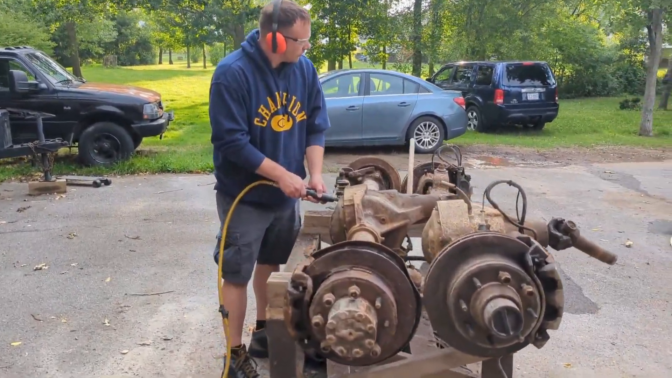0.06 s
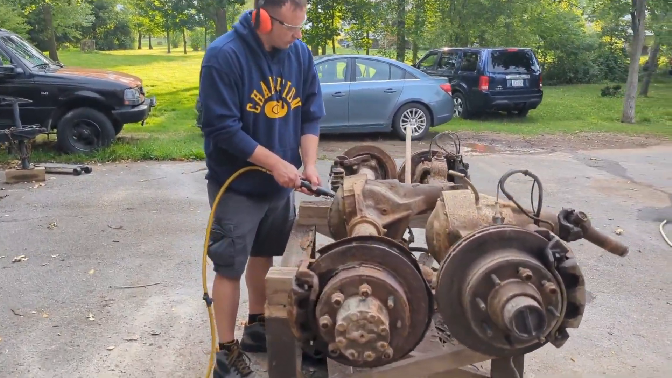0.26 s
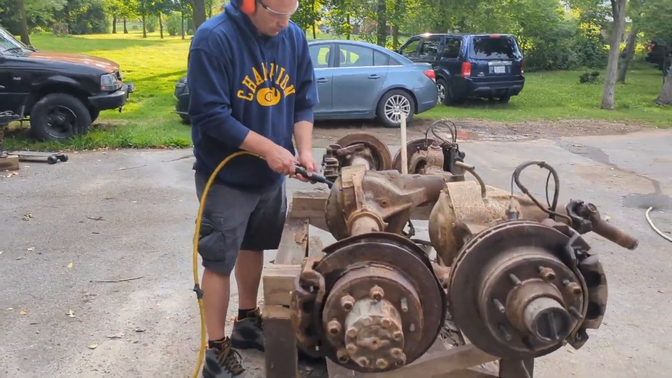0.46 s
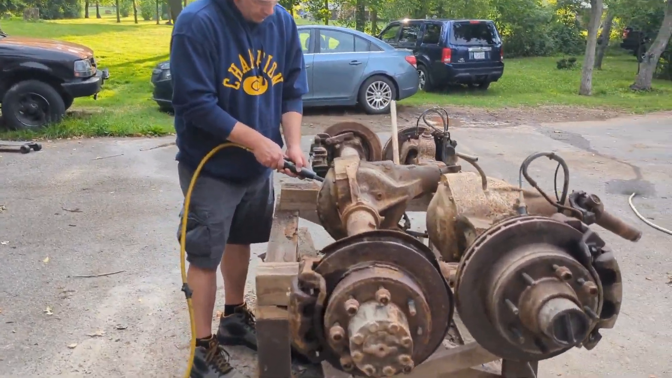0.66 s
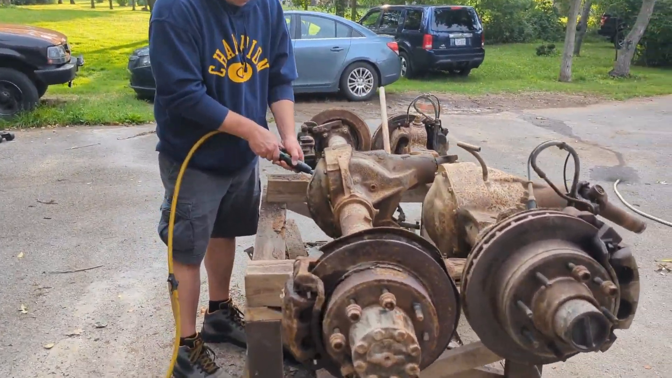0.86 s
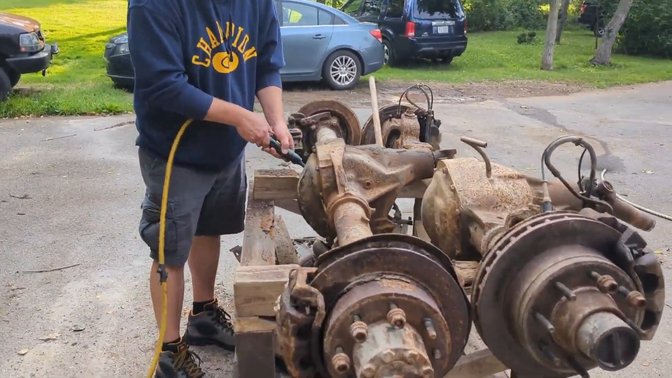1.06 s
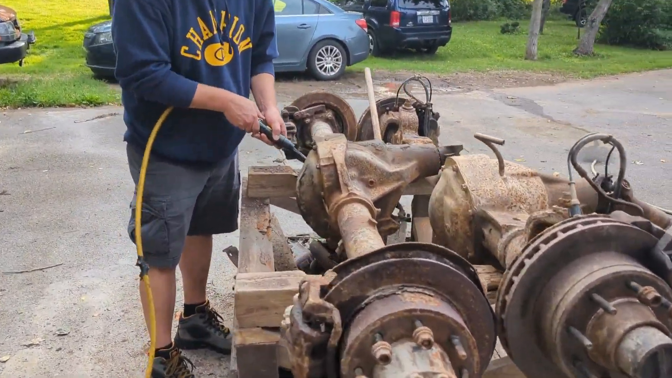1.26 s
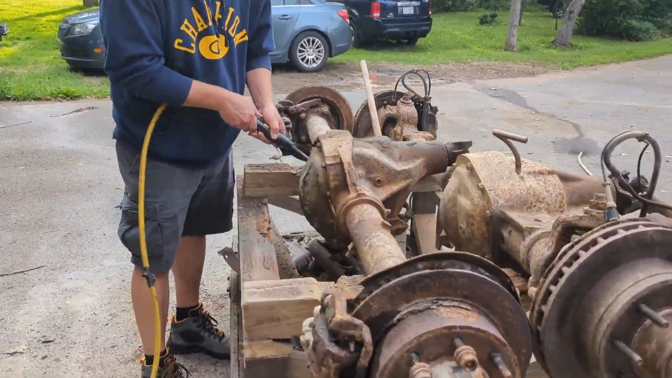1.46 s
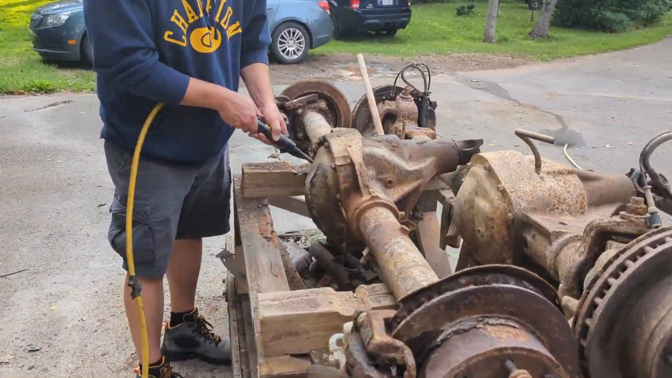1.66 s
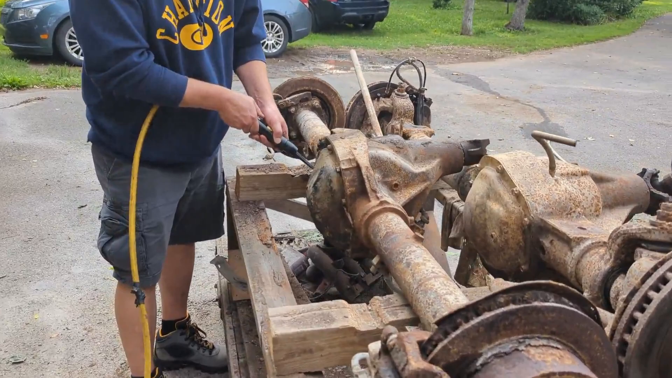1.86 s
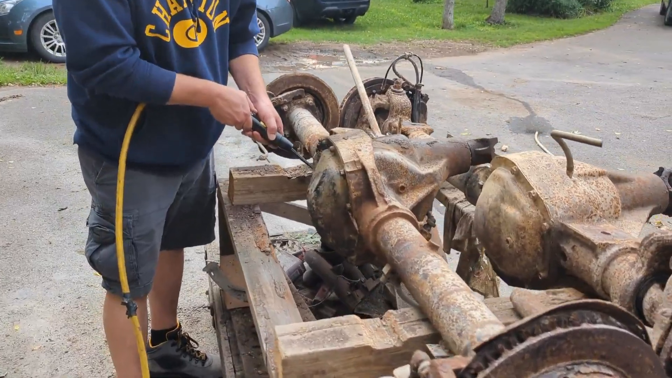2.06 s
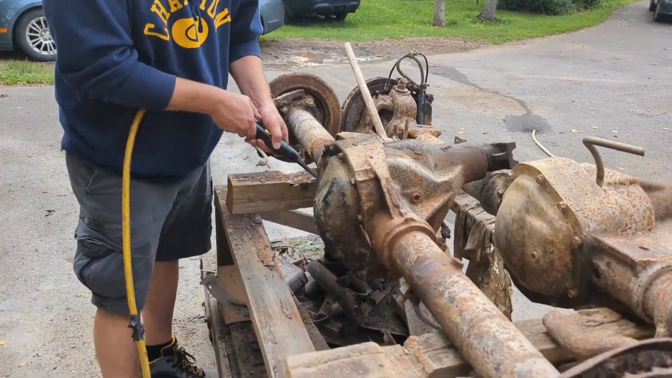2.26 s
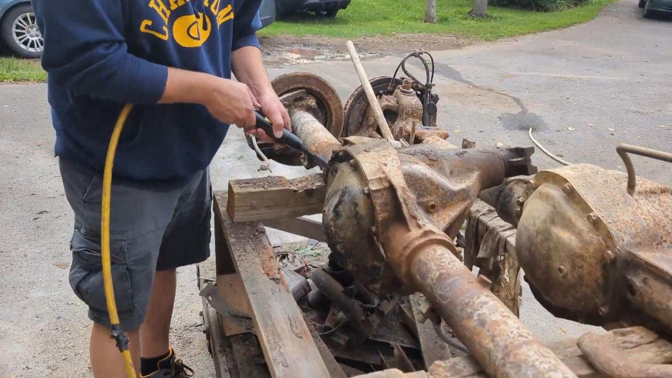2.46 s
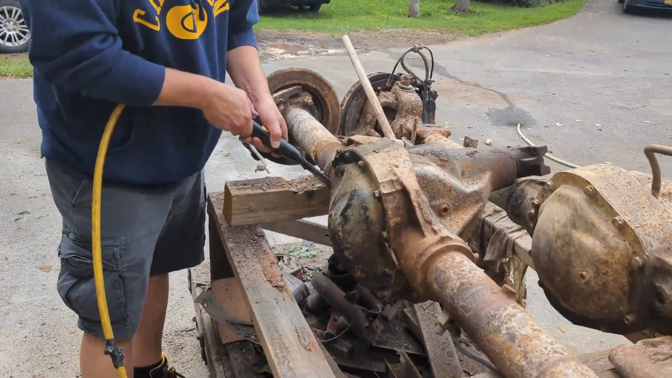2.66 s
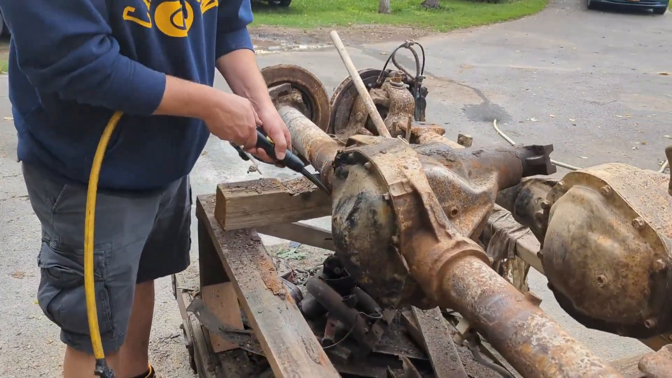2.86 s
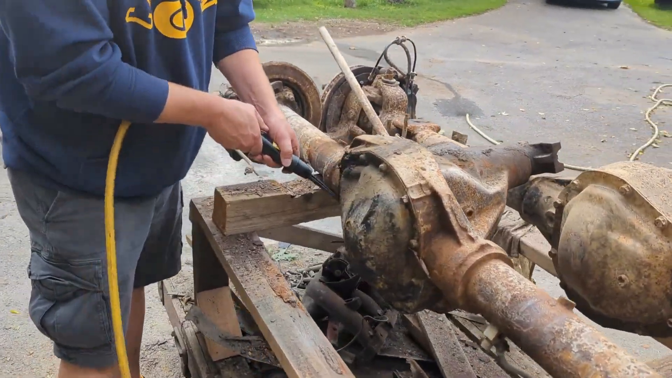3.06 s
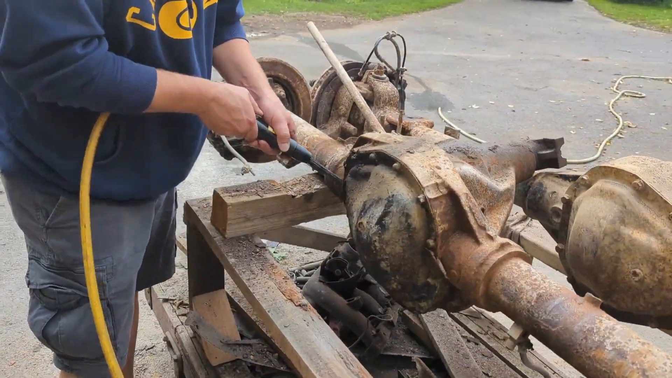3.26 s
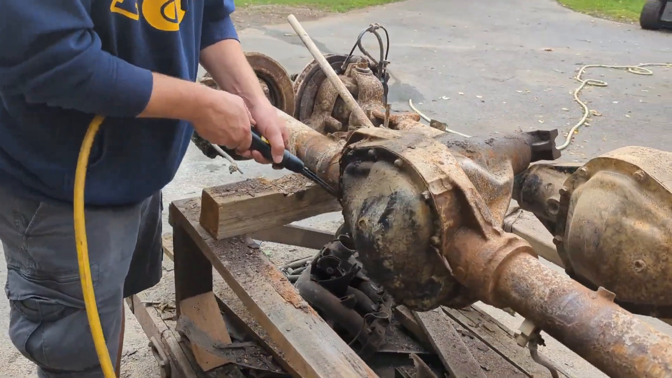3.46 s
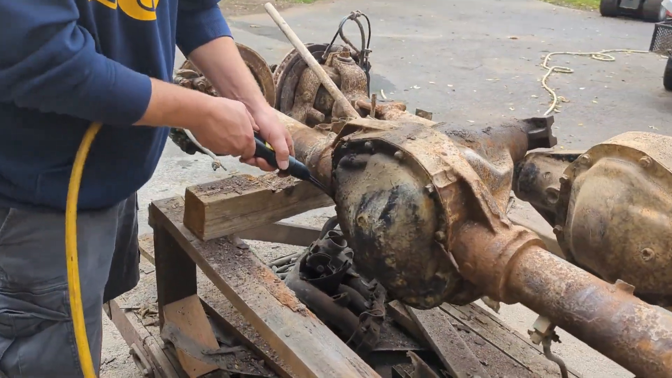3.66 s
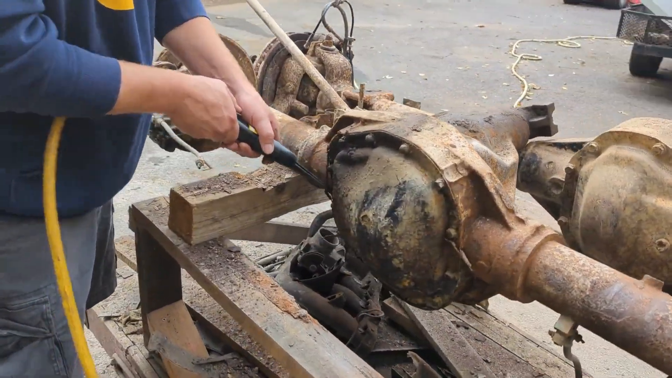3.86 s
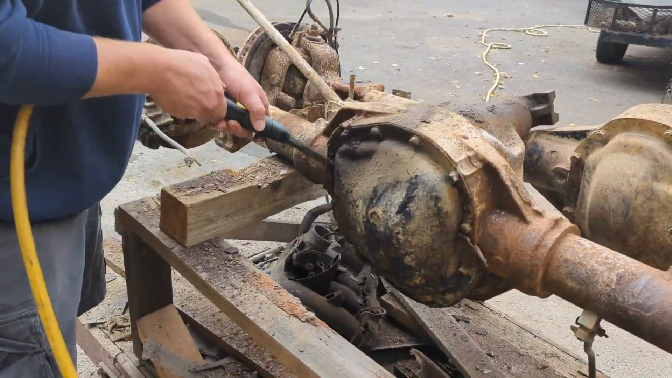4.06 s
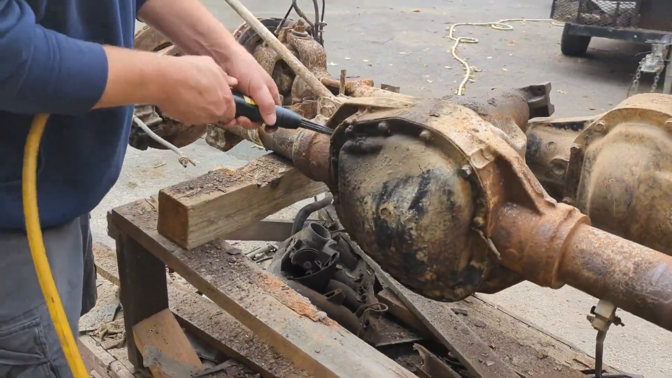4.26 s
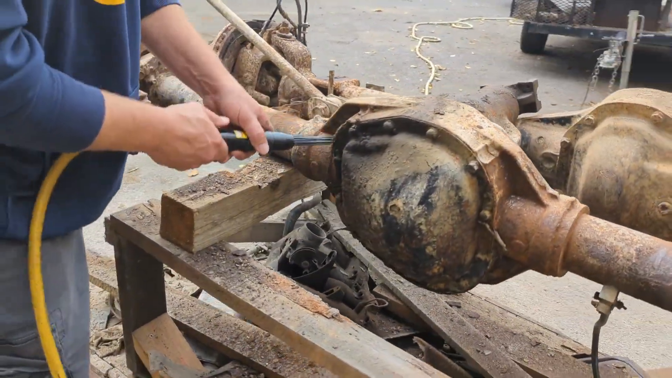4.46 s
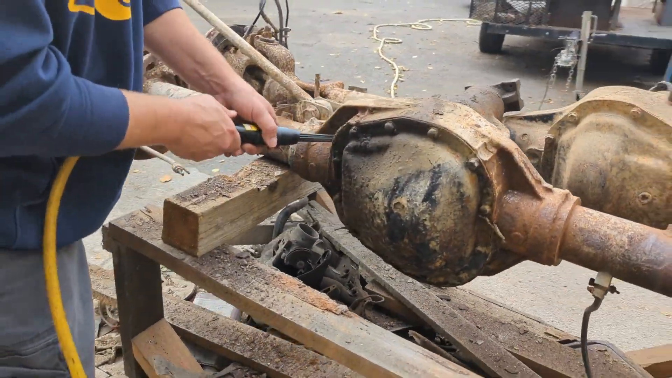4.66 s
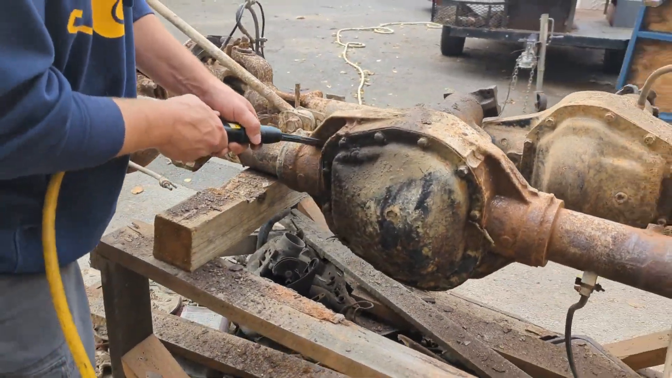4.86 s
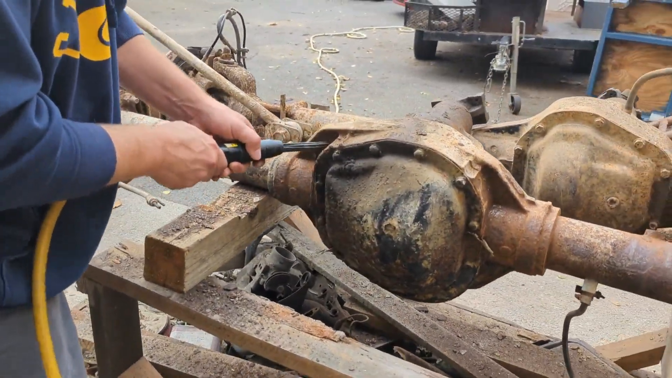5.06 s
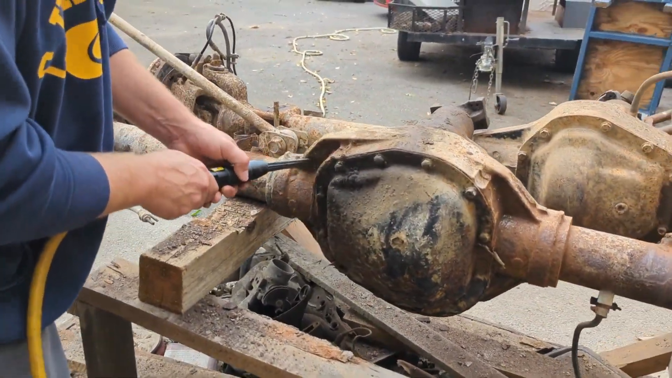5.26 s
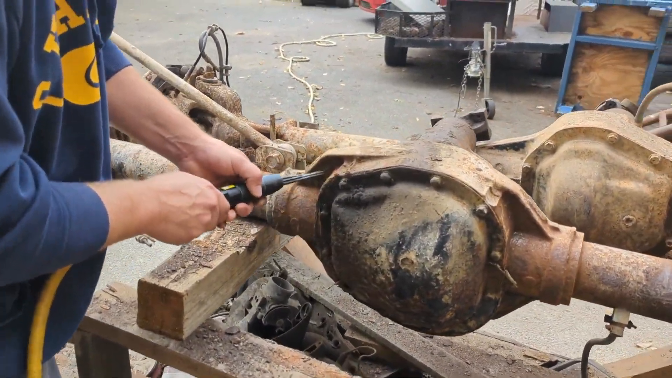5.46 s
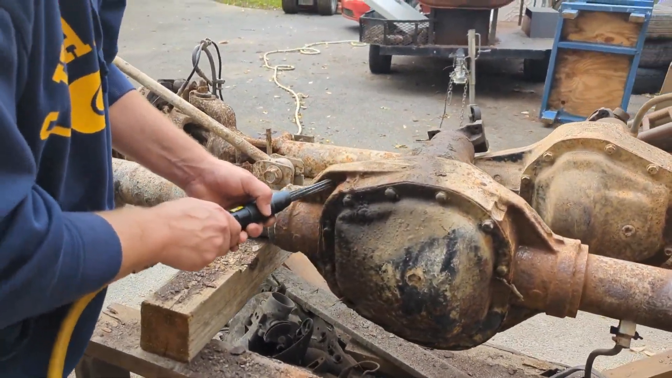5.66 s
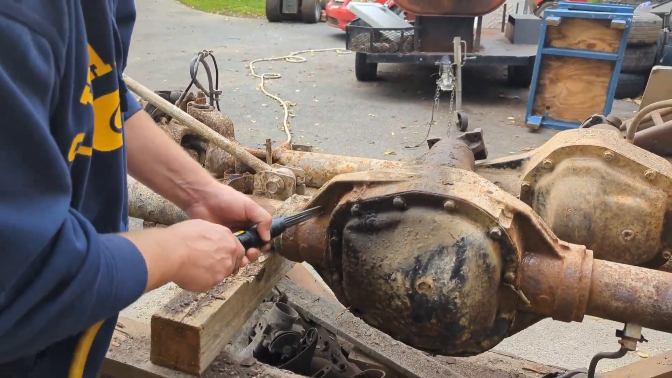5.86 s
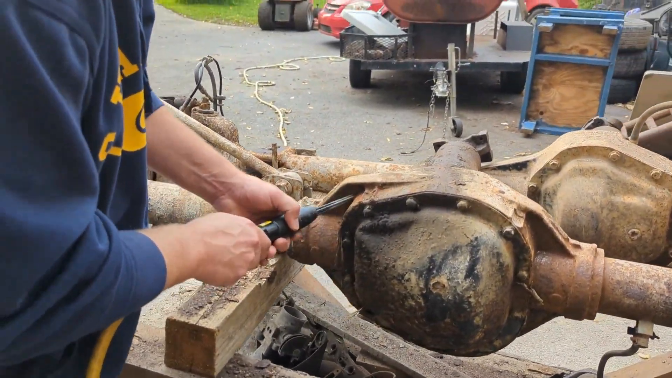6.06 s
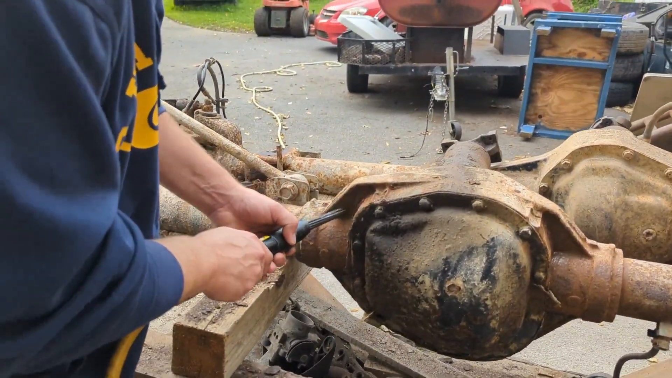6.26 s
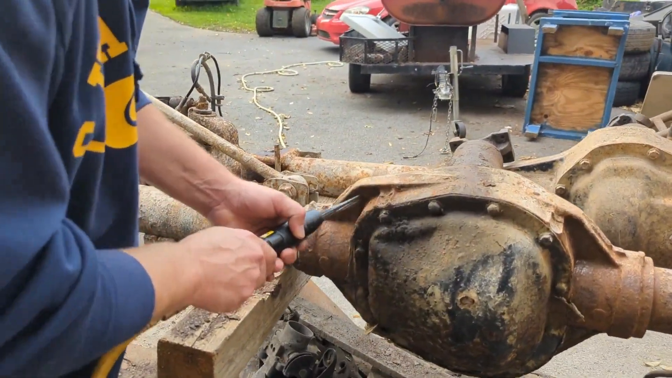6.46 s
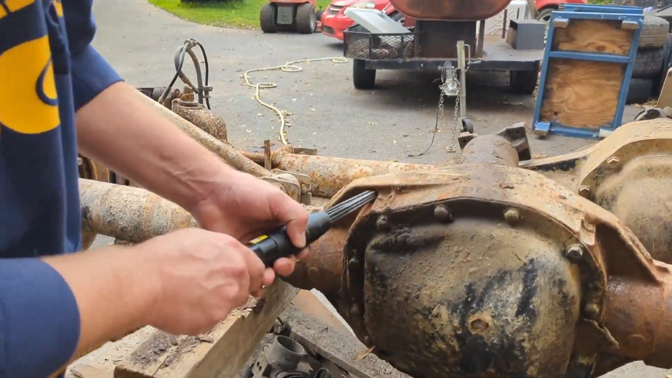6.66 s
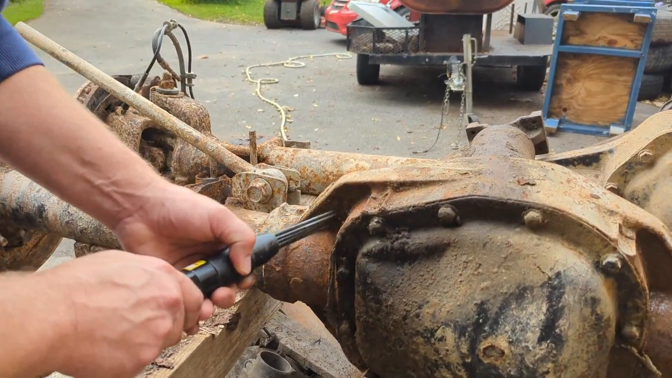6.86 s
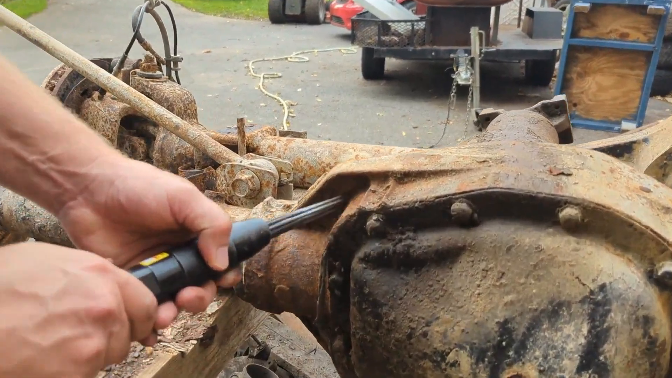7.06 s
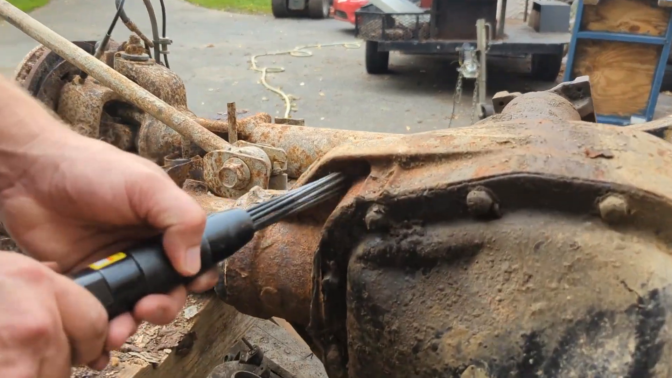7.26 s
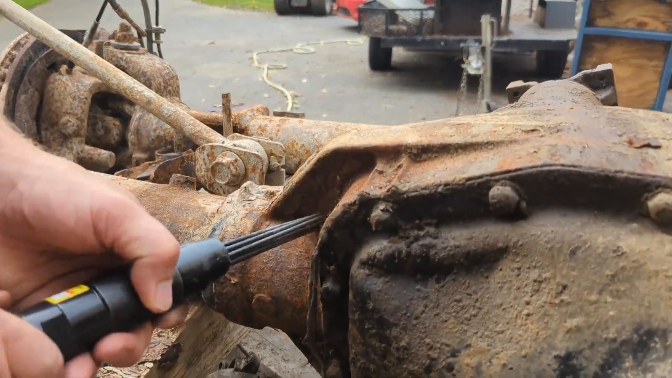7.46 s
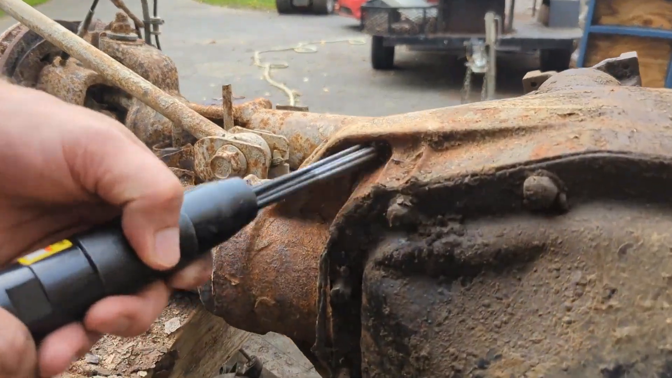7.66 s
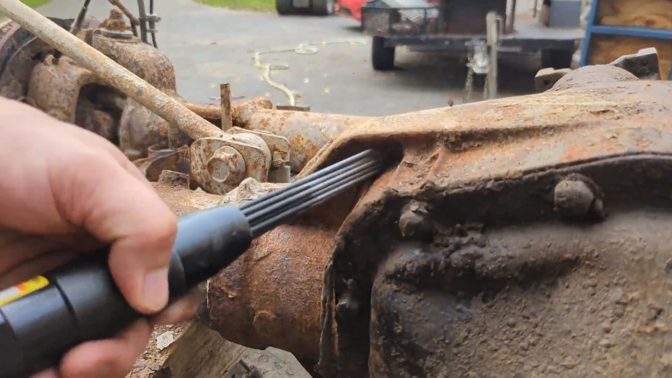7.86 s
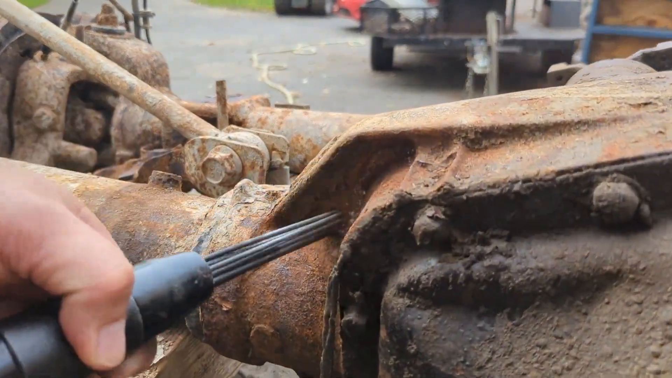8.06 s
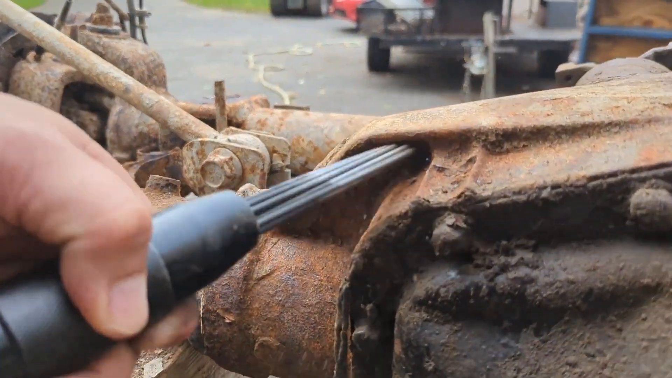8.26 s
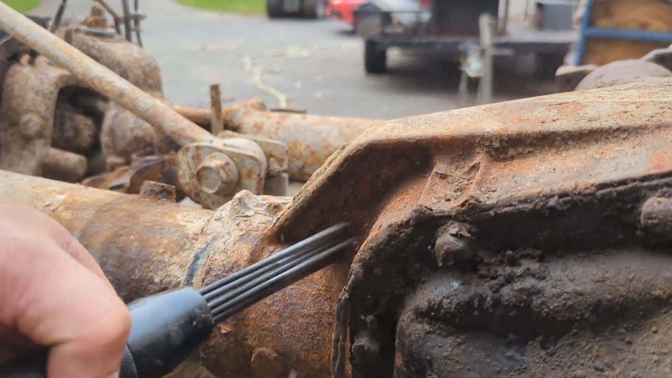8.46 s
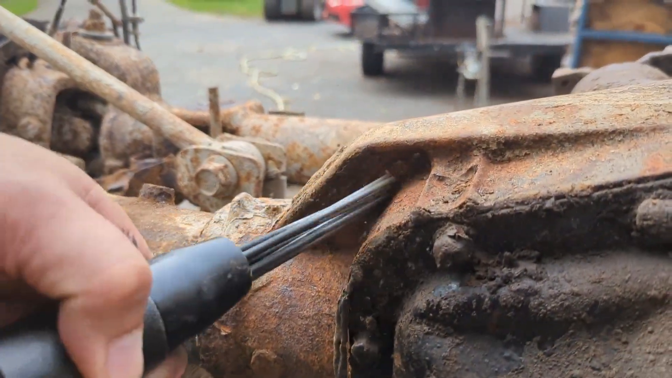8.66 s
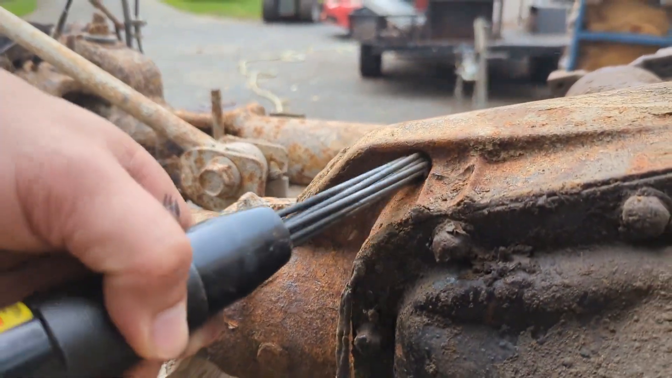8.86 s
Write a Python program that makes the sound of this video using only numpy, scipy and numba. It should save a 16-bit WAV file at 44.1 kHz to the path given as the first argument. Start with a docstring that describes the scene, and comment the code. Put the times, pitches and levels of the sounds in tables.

```python
"""Needle scaler on a steel axle

An air needle scaler hammers rust off a steel axle outdoors while a phone is carried up to it.
Each piston stroke puffs air through an exhaust port, made of clicks and leaking noise in three resonances.
It also flings a bundle of needles that land and rebound unevenly: clicks and gritty noise excite a bare
crack and the modes of the casting, the barrel, the needles and the other steel parts.
A light wind, low filtered noise in gusts, bumps the microphones."""
import sys
import numpy as np
from scipy import signal
from scipy.fft import rfft, irfft
from scipy.io import wavfile
from scipy.ndimage import uniform_filter1d
from numba import njit

SR = 44100
rng = np.random.default_rng(int(sys.argv[2]) if len(sys.argv) > 2 else 0)


def to_wav(sig):
    """Store sig (one row per channel, or 1-D mono) as 16-bit WAV at the path in sys.argv[1].

    Samples outside -1..1 are clipped; the rate is SR.
    """
    pcm = np.clip(np.atleast_2d(sig), -1, 1) * 32767
    pcm = np.round(pcm).astype(np.int16)
    wavfile.write(sys.argv[1], SR, pcm.T)  # frames by channels


def invert_db(level):
    """Linear amplitude ratio for a level in decibels (20 dB per decade), elementwise."""
    return 10 ** (np.asarray(level, dtype=float) / 20)


N = 392931  # length in samples


def track(table):
    """Columns of a curve after its time column, interpolated to one value a sample."""
    s, *columns = np.transpose(table)
    return [np.interp(np.arange(N) / SR, s, c) for c in columns]


def swells(table):
    """Sum of bell-shaped level changes in dB, stepped every 64 samples."""
    t = np.arange(0, N, 64) / SR
    total_db = sum(db * np.exp(-((t - s) / half) ** 2) for s, db, half in table)
    return np.repeat(total_db, 64)[:N]


def wander(hz):
    """Random levels, one every 1 / hz s, joined by straight ramps; rms 1."""
    hold = int(SR / hz)
    levels = np.repeat(rng.standard_normal(N // 1000), hold)[:N]
    return unit(uniform_filter1d(levels, hold))


def unit(x):
    """Scale to rms 1."""
    return x / np.sqrt(np.mean(x ** 2))


def pan(db):
    """Gains of the two channels, left minus right in dB."""
    return invert_db(np.array([[db], [-db]]) / 2)


@njit
def svf(x, hz, width):
    """State-variable band-pass with a moving centre."""
    y, b, l = np.empty(len(x)), 0., 0.
    for i in range(len(x)):
        g, k = np.tan(np.pi * hz[i] / SR), width / hz[i]
        v = (b + g * (x[i] - l)) / (1 + g * (g + k))
        b, l, y[i] = 2 * v - b, l + 2 * g * v, k * v
    return y


def band(x, hz, width):
    """A resonance on every channel; centre and width in Hz."""
    return np.array([svf(c, hz * np.ones(N), 1. * width) for c in np.atleast_2d(x)])


def clicks(at, size):
    """Impulses at the given sample places."""
    return np.bincount(np.clip(at, 0, N - 1).astype(int).ravel(), size.ravel(), N)


def paths(shared):
    """Noise that the two microphone ports hear partly alike; shared is the common share of power."""
    both, *own = rng.standard_normal((3, N))
    shared = np.clip(shared, 0, 1)
    return np.sqrt(shared) * both + np.sqrt(1 - shared) * np.array(own)


def ports(x, lag=14):
    """The right microphone port hears later, by lag samples."""
    x = np.broadcast_to(x, (2, N))
    return np.array([x[0], np.roll(x[1], lag)])


# slow level of the wind, before a make-up gain: start_s, relative_db
WIND_LEVEL = [(0, -61), (1.3, -66), (2.0, -51.5), (2.45, -73), (4.6, -69.5), (5.3, -84), (6.8, -71),
              (7.3, -69), (7.85, -53), (8.91, -55)]
# gusts on top of it: centre_s, lift_db, half_length_s
WIND_GUSTS = [(.35, 19, 0.064), (.52, 13, 0.029), (.7, 22, 0.058), (1.33, 9, .08), (1.66, 11, .05),
              (1.84, 10, 0.034), (1.97, 6, .06), (2.14, 13, 0.061), (2.68, 21, 0.15), (3.24, 14, 0.1),
              (3.75, 13, 0.065), (4.22, 11, 0.082), (4.58, 12, 0.11), (6.11, 18, 0.054), (8.08, 1, .08),
              (8.61, 2, 0.035)]


def wind():
    """Low rumble, partly shared by the two ports; the phone cuts the deepest bass."""
    rumble = band(paths(shared=0.38), 67, 55)
    rumble = band(band(rumble, 61, 96), 70, 120)
    make_up_db = 10.5
    return invert_db(track(WIND_LEVEL)[0] + swells(WIND_GUSTS) + make_up_db) * pan(5.5) * unit(rumble)


# speed of the piston: start_s, strokes_per_second
PISTON_RATE = [(0.0, 63.61), (0.2, 64.66), (0.24, 70.24), (0.28, 64.78), (0.5, 63.17), (0.63, 63.99),
               (0.67, 67.43), (0.74, 64.75), (1.02, 63.24), (1.1, 58.73), (1.16, 61.69), (1.4, 65.23),
               (1.47, 64.55), (1.52, 74.92), (1.56, 73.31), (1.63, 64.48), (1.8, 65.61), (1.95, 61.18),
               (1.99, 63.66), (2.04, 62.03), (2.2, 67.37), (2.32, 60.39), (2.36, 54.6), (2.4, 60.48),
               (2.52, 66.39), (2.68, 66.23), (3.18, 62.17), (3.42, 64.68), (3.48, 66.8), (3.54, 64.42),
               (3.83, 62.17), (3.88, 59.22), (3.93, 62.06), (4.21, 64.65), (4.41, 67.44), (4.48, 64.16),
               (4.56, 65.86), (4.67, 65.72), (4.71, 69.41), (4.82, 62.4), (4.94, 64.06), (5.16, 64.4),
               (5.29, 63.37), (5.39, 64.17), (5.8, 65.46), (5.9, 64.53), (6.04, 64.37), (6.08, 64.3),
               (6.12, 68.03), (6.17, 64.19), (6.56, 64.98), (6.64, 65.75), (6.68, 69.44), (6.86, 65.55),
               (6.93, 66.19), (6.99, 62.87), (7.03, 67.01), (7.07, 64.61), (7.4, 66.96), (7.64, 65.25),
               (7.8, 63.23), (7.88, 69.02), (7.99, 65.82), (8.04, 65.12), (8.34, 64.64), (8.38, 66.91),
               (8.45, 65.29), (8.58, 64.7), (8.68, 64.83), (8.91, 63.87)]


def piston():
    """Strokes counted along time as the sum of the stroke rate; a blow falls at each whole count."""
    share_done_at_start = .225
    strokes = share_done_at_start + np.cumsum(track(PISTON_RATE)[0]) / SR
    blows = np.flatnonzero(np.diff(np.floor(strokes))) + 1.
    return strokes, blows


# pop timing and first echo off the ground: start_s, echo_delay_ms, echo_db, pop_scatter_ms, pop_lag_ms
GROUND_ECHO = [(0, 3.6, -7, .03, .2), (.75, 3.65, -7, .03, .1), (1.1, 4.2, -9, .03, -.2),
               (1.4, 4.2, -8, .03, -.3), (1.8, 4.8, -8, .03, -.3), (2.2, 5.2, -9, .03, -.3),
               (2.5, 3.5, -16, .04, .2), (3.1, 3.5, -16, .05, .3), (3.8, 6.3, -10, .06, .3),
               (4.2, 3.9, -10, .07, .4), (4.8, 4.7, -9, .06, .4), (6.3, 4.7, -9, .06, .3),
               (7.3, 5.2, -11, .06, .3), (7.7, 5.0, -11, .08, .3), (8.91, 4.9, -10, .08, .3)]
# later echo off the second axle: start_s, delay_ms, level_db (against the pop)
SECOND_AXLE_ECHO = [(0, 6.2, -21), (1.3, 6.3, -4.5), (2.1, 6.4, -4.5), (2.5, 7.94, -14.5), (3.8, 7.6, -7),
                    (4.2, 7.4, -18), (4.8, 7.2, -9.5), (6.5, 7.75, -6), (6.8, 7.75, -20), (7.6, 5.8, -24),
                    (8.91, 5.7, -19)]
# the valve cracking open ahead of the pop: start_s, level_db (against the pop)
VALVE_CRACK = [(0, -33), (.7, -18), (1.0, -5), (1.5, -34), (3.8, -21), (4.8, -13), (6, -11), (7.2, -27),
               (8.91, -18)]


def air_pops(strokes, blows):
    """Each stroke lets out a valve click, a pop and two echoes, over air leaking between strokes."""
    valve_lead_ms = 2.12
    at_blow = blows.astype(int)
    echo_ms, echo_db, slip_ms, lag_ms = (c[at_blow] for c in track(GROUND_ECHO))
    axle_ms, axle_db = (c[at_blow] for c in track(SECOND_AXLE_ECHO))
    valve_db = track(VALVE_CRACK)[0][at_blow]
    size, second, wait, slip = rng.standard_normal((len(blows), 4)).T
    pop_at = blows + SR * (lag_ms + slip_ms * slip) / 1000
    echo_at = pop_at + SR * (echo_ms + 2 * slip_ms * wait) / 1000
    pops = clicks(pop_at, invert_db(.6 * size))
    pops = pops + clicks(echo_at, invert_db(echo_db + .6 * size + 1.2 * second))
    pops = pops + clicks(pop_at - SR * valve_lead_ms / 1000, invert_db(valve_db + 4.5 * wait))
    pops = pops + clicks(pop_at + SR * axle_ms / 1000, invert_db(axle_db + .6 * size))
    # the leak weakens through each stroke
    leak_db = .5 * track(FILL_AND_REBOUND)[0] - 37 - 5 * (strokes % 1)
    return pops + paths(shared=.8) * invert_db(leak_db)


# exhaust port as it turns: start_s, off_axis_db, upper_hz, lower_hz, lower_over_upper_db
PORT_TURN = [(0, -5, 826, 706, -3), (.7, -4, 817, 662, -3.5), (1.2, -2, 795, 640, -11.5),
             (1.5, -5.5, 760, 665, 0.5), (2.0, -2, 753, 678, -3), (2.2, -6.5, 780, 704, 3.5),
             (2.53, -14, 800, 680, 0), (2.62, -8, 755, 640, 1), (3.1, -12, 870, 727, -2),
             (3.4, -14.5, 1050, 660, -1.5), (3.8, -12.5, 895, 680, -4), (4.1, -16.5, 1040, 635, -6.5),
             (4.6, -11.5, 990, 557, -4.5), (5.1, -14, 980, 545, -3), (5.5, -12, 1010, 600, -2.5),
             (5.9, -14.5, 980, 600, 3), (6.4, -14, 866, 530, 0), (6.8, -12, 925, 467, -9),
             (7.35, -10.5, 860, 620, -6.5), (7.55, -4, 906, 630, -5), (8.2, -0.5, 994, 648, -0.5),
             (8.91, -1.5, 950, 590, -4.5)]
# the puffs swell for a moment: centre_s, lift_db, half_length_s
PUFF_SWELLS = [(.32, 2, 0.025), (.88, 0, 0.062), (1.28, 2.5, 0.033), (1.56, 0.5, 0.025), (1.8, 2.5, 0.24),
               (2.04, 4.5, 0.054), (2.63, 7, 0.0077), (2.74, 10.5, 0.079), (2.9, 3.5, 0.025),
               (3.05, 6.5, 0.15), (3.5, 5, 0.03), (3.74, 4.5, 0.042), (4.09, 7.5, 0.14), (4.21, 7.5, 0.031),
               (4.36, 7.5, 0.04), (4.56, 4, 0.028), (4.7, 9.5, 0.054), (5.61, 2.5, 0.017), (5.72, 0, 0.027),
               (6.18, 3, 0.01), (7.1, 4, 0.11), (7.3, 3, 0.025), (7.42, 12, 0.0063), (7.52, 5.5, 0.049),
               (7.74, 5, 0.13), (8.41, 1.5, 0.038), (8.54, 6, 0.012), (8.66, 1.5, 0.016), (8.84, 3, 0.012)]
# third resonance of the port: start_s, pitch_hz, level_db (over the upper one)
PORT_THIRD = [(0, 1220, -10), (.7, 1160, -7.5), (1.0, 1090, -18), (1.3, 990, -36), (1.45, 930, 0.5),
              (2.1, 934, 0.5), (2.4, 1000, -4.5), (2.6, 1470, -8.5), (3.3, 1450, -10), (3.8, 1330, -6.5),
              (4.8, 1200, -3), (5.6, 1180, -10), (6.5, 1200, -6.5), (7.0, 1180, -8.5), (7.6, 1260, -6),
              (8.91, 1200, -6.5)]
# throb orders above the second: stroke_multiple, relative_db, phase_rad
THROB_ORDERS = [(3, 4.5, 0.46), (4, -5, 1.25), (5, -0.5, 0.22), (6, -25, 5), (7, -7.5, 2.3)]


def exhaust(strokes, blows):
    """Pops and echoes ring the port; the pressure swing gives low orders of the stroke rate."""
    puff_on_axis_db, throb_on_axis_db, first_on_axis_db = -26, -33, -4  # the first is relative to the throb
    throb_fall, first_fall = 0.89, 1.14  # dB lost for each dB off the axis
    wander_db, pitch_wander = 1.4, 0.008  # rms; pitch as a share
    off_db, upper_hz, lower_hz, lower_db = track(PORT_TURN)
    shake = [wander(14) for _ in range(6)]
    puff_db = puff_on_axis_db + off_db + swells(PUFF_SWELLS) + wander_db * shake[0]
    lower_db = lower_db + wander_db * (shake[1] - shake[0])
    throb_db = throb_on_axis_db + throb_fall * off_db + 0.97 * wander_db * shake[2]
    first_db = first_on_axis_db + first_fall * off_db + 0.34 * wander_db * shake[3]
    upper_hz = upper_hz * (1 + pitch_wander * shake[4])
    lower_hz = lower_hz * (1 + pitch_wander * shake[5])
    third_hz, third_db = track(PORT_THIRD)

    pops = air_pops(strokes, blows)
    upper = unit(band(band(pops, upper_hz, 190), upper_hz, 900))
    third = unit(band(band(pops, third_hz, 265), third_hz, 400))
    lower = unit(band(band(pops, lower_hz, 170), lower_hz, 350))
    # the third and lower resonances are opposite in polarity to the upper one
    puff = invert_db(puff_db) * pan(-1.5) * (upper - invert_db(third_db) * third - invert_db(lower_db) * lower)

    turn = 2 * np.pi * strokes
    throb = unit(sum(invert_db(db) * np.cos(k * turn + rad) for k, db, rad in THROB_ORDERS))
    # the lowest orders reach the phone only when it is near the port's axis
    throb = throb + invert_db(first_db + 9.5) * np.cos(turn + 0.22)
    throb = throb + invert_db(0.48 * first_db + 0.5) * np.cos(2 * turn + 3.2)
    rush = invert_db(-8) * unit(band(band(paths(shared=.85), 200, 240), 190, 300))
    # the exhaust points elsewhere, so its lag between the ports is shorter
    return ports(puff + invert_db(throb_db) * pan(0.34) * (throb + rush), lag=8)


# bare crack of steel on scale: pitch_hz, level_db, left_minus_right_db
CRACK_COLOUR = [(600, -103, -14), (1200, -15.5, -18), (1640, -42, -25), (2850, -3.5, 1.5), (4150, -8, -5.5),
                (8000, -7, 26), (9700, -4, -3), (9970, 8, 1), (14100, 3, 12), (14500, -3, 14),
                (14800, -9, 24.5)]


def crack(force):
    """Steel meeting scale without ringing: the force filtered by a smooth spectrum for each side."""
    hz, db, side_db = np.transpose(CRACK_COLOUR)
    f = np.log(np.arange(N // 2 + 1) * SR / N + 1)
    middle_db = np.interp(f, np.log(hz), db)
    sides_db = np.interp(f, np.log(hz), side_db) * np.array([[.5], [-.5]])
    return unit(irfft(rfft(force) * invert_db(middle_db + sides_db), N))


def ring(modes, force, damp, strokes, blows):
    """A steel part as a sum of resonances, each struck a little differently on every stroke."""
    part = 0
    for hz, width, db, side_db in modes:
        # every stroke lands elsewhere: a mode is hit harder or softer, a little off pitch
        luck, bend = rng.standard_normal((len(blows) + 1, 2))[strokes.astype(int)].T
        bent_hz = hz + 0.22 * width * np.clip(bend, -2, 2)
        mode = unit(band(force * invert_db(1.1 * luck), bent_hz, width))
        part = part + invert_db(db) * pan(side_db) * mode
    return unit(part * damp)


# where the tool is set decides what rings: start_s, casting_db, rib_db, nose_db, needle_ring_db (over the clatter)
TOOL_SPOTS = [(0, -2.5, -7, -31, -18), (.5, -7, -9, -10, -26), (.8, -7, -6.5, -10, -20),
              (1.0, -4.5, -8.5, -0.5, -10), (1.45, -1.5, -5, -0.5, -12), (1.7, -5, -5.5, -29, -26),
              (2.1, -12, -1, -9, -7), (2.6, -12, -7.5, -10, -12), (3.0, -15, -5.5, -9, -4),
              (4.1, -20, -8, -13, -17), (4.6, -12.5, -7, -14, -7), (5.0, -16, -6.5, -13, -10),
              (5.4, -16, -10.5, -3, 2), (5.8, -12.5, -9.5, -9, -5), (6.3, -17, -11, -22, -10),
              (6.6, -12, -8.5, -31, -19), (7.1, -16, -4.5, -35, -12), (7.5, -10, -0.5, -2, -14),
              (8.0, -5.5, 0.5, -23, -6), (8.91, -2.5, 5, -7, -12)]
# how the tool's own steel faces the phone: start_s, high_ring_lift_db, collar_db (over the clatter)
TOOL_FACING = [(0, -4, -31), (.8, -8, -3.5), (1.3, -11, -7), (1.8, -6, 0), (2.8, -4, -3), (3.6, -1, -4.5),
               (4.2, 2, -2.5), (4.8, 3, -9.5), (5.5, 1, -8), (6.5, -4, -19), (7.2, 6, -20), (7.6, 1.5, -32),
               (8.91, 4, -34)]
# the needles slide over a thin flange: centre_s, lift_db, half_length_s
FLANGE_SLIDES = [(.3, 16, .05), (.8, 16, .06), (1.55, 25, .07), (2.52, 22, .05)]
# the needles cross the rim of the round cover: centre_s, lift_db, half_length_s
COVER_CROSSINGS = [(.35, 19, 0.062), (.8, 16.5, 0.11), (1.4, 14, .25), (2.5, 14.5, 0.25), (3.55, 11, 0.16),
                   (3.95, 12, .06), (4.4, 9, 0.18), (5.62, 16, 0.12), (6.2, 2, 0.091), (6.7, 16, .12),
                   (6.95, -1, .15), (7.27, 19, 0.067), (7.75, 13, 0.12), (8.4, 10.5, 0.49)]
# how strongly the web above the cover rings: start_s, level_db (over the clatter)
WEB_LEVEL = [(0, -10), (1.0, -11), (2.0, -16), (4, -25), (5.5, -36), (6.5, -34.5), (7.1, -19), (7.6, -13),
             (8.1, -14), (8.91, -26)]
# random level wander of each part, in the order returned below: rms_db
PART_WANDER = (2.4, 1.5, 1.5, 2.0, 3.0, 1, 3.0, 2.0, 2.0, 2.0)


def part_levels():
    """Level of each ringing part over the clatter in dB, as the tool moves, with a random wander."""
    casting_db, rib_db, nose_db, ring_db = track(TOOL_SPOTS)
    high_lift_db, collar_db = track(TOOL_FACING)
    # the barrel fades by a share of what the rib gains over its load level of -6 dB
    barrel_db = -2 - 0.38 * np.maximum(rib_db + 6, 0)
    flange_db = -36 + swells(FLANGE_SLIDES)
    high_db = .5 * ring_db + high_lift_db - 0.5
    cover_db = -24 + swells(COVER_CROSSINGS)
    web_db = track(WEB_LEVEL)[0]
    levels = (casting_db, rib_db, barrel_db, nose_db, ring_db,
              flange_db, high_db, collar_db, cover_db, web_db)
    return [db + depth * wander(9) for db, depth in zip(levels, PART_WANDER)]


# single blows that land harder or softer than usual: time_s, peak_db (relative)
UNEVEN_BLOWS = [(1.0869, -9), (1.281, -9), (1.4671, -8), (2.3436, -4), (2.362, -3.5), (3.8292, -8),
                (3.8626, -12), (3.8791, -3), (3.912, -8), (3.9444, -1), (3.9918, -9), (4.7716, -10),
                (4.8349, -6), (4.9616, -5), (5.0389, -10), (5.257, -10), (5.3353, -12), (5.4914, -12),
                (5.8296, -9), (5.9993, -8), (6.1848, -8), (6.9616, -3.5), (7.1611, 3), (7.5687, -4.5),
                (7.66, -2), (7.7074, -1)]


def blow_changes(blows):
    """Level change in dB of each listed blow, up or down; it goes to the nearest blow, the others get none."""
    usual_db = -8.5
    at, peak_db = np.transpose(UNEVEN_BLOWS)
    nearest = np.abs(blows[:, None] - at * SR).argmin(axis=0)
    return np.bincount(nearest, peak_db - usual_db, len(blows))


def landings(blows, change_db, first_s, rebound_s, scatter_s, rebound_share, rebound_db,
             spread_db, blow_db, piston_db):
    """The piston meets the anvil; some needles land with it, the rest rebound in a loose cluster some ms on."""
    needle_count = 19
    wait, late, size, sign = rng.random((len(blows), needle_count, 4)).T
    hard, bounce, when = rng.standard_normal((len(blows), 3)).T
    late = late < rebound_share
    delay = -np.log(1 - wait) * np.where(late, scatter_s, first_s)
    delay = delay + late * rebound_s * np.exp(.35 * when)
    db = -spread_db * np.log(1 - size) + blow_db * hard
    db = db + np.where(late, rebound_db + 4.1 * bounce, change_db)
    anvil_hit = clicks(blows, invert_db(piston_db + blow_db * hard + change_db))
    return unit(anvil_hit + clicks(blows + delay * SR, invert_db(db) * np.sign(sign - .5)))


# needles as the phone comes closer: start_s, clatter_db (relative)
CLATTER_LEVEL = [(0, -34.5), (.3, -26), (.65, -27), (1.3, -24), (1.5, -23), (2.2, -21.5), (2.6, -21),
                 (3.4, -20), (3.7, -19), (4.0, -19.5), (4.5, -19.5), (5.1, -18), (5.5, -19), (6.1, -16),
                 (7.0, -16), (7.25, -19.5), (7.5, -17), (8.91, -20)]
# the bundle bites harder (plus) or skids (minus) for a moment: centre_s, change_db, half_length_s
BUNDLE_BITES = [(.77, 4, 0.055), (.97, 3, 0.043), (1.44, -2, 0.048), (1.81, 1, 0.044), (2.46, 2, 0.079),
                (2.73, 1, 0.06), (2.9, 0, 0.045), (3.08, -1, 0.046), (3.2, 1, 0.042), (3.43, -0.5, 0.054),
                (3.55, 4, 0.031), (3.92, 1, .03), (4.22, 2.5, 0.16), (4.32, -3.5, 0.022),
                (4.69, 1.5, 0.031), (4.94, -7, 0.0067), (5.34, 4, 0.019), (5.58, 0.5, 0.031),
                (5.76, 5, 0.064), (5.79, -6, 0.022), (5.86, 1.5, 0.018), (6.2, 1, 0.063), (6.6, -2, 0.023),
                (7.12, 0.5, 0.034), (8.34, 1.5, 0.03), (8.64, 1.5, .05)]
# the gaps between blows fill more or less; the needles' rebound varies in delay and strength:
# start_s, fill_db (relative), rebound_ms, rebound_db
FILL_AND_REBOUND = [(0, 17.5, 4.1, 10), (.5, 10, 8.1, 8), (1.2, 8, 3.5, 6.5), (2.0, 4, 8.6, 12),
                    (2.3, 4, 7.4, 2), (2.6, 5.5, 4, 7), (2.9, 3.5, 6.6, 12), (3.5, 6.5, 2.9, 8),
                    (3.75, 6, 4.2, -4), (4.05, 1, 3.3, 8.5), (4.3, 5.5, 6.9, 7.5), (4.65, 6.5, 7.1, 12),
                    (4.9, 0.5, 3.8, 12), (5.9, 1, 2.8, 5), (6.3, 1.5, 4, 11), (7.0, 2, 4.8, 10),
                    (7.25, 9.5, 4, 11), (7.45, 1.5, 4.5, -2), (7.65, -4.5, 4.2, 9.5), (8.0, 2.5, 3.8, 1.5),
                    (8.91, 1, 2.94, 5)]
# modes of each ringing part: pitch_hz, width_hz, relative_db, left_minus_right_db
CASTING_MODES = [(1230, 670, 6, 0.5), (2166, 620, 8, -0.5), (2900, 1060, -5.5, 7), (3820, 97, 0, -7)]
RIB_MODES = [(5313, 480, 6, -6), (6840, 130, -31, -13), (6440, 920, -2.5, -18.5)]
BARREL_MODES = [(7720, 110, -3, -12.5), (8490, 110, -5.5, -7.5), (8090, 420, 5.5, -12)]
NOSE_MODES = [(11870, 470, 3.5, 5.6)]
NEEDLE_MODES = [(10190, 140, 0, 3), (10350, 400, -6, 3), (10950, 350, -10, 3)]
FLANGE_MODES = [(2500, 220, 0, -2)]
HIGH_NEEDLE_MODES = [(13020, 140, 1, 7), (13200, 420, -2, 7), (14300, 350, -10, 7)]
COLLAR_MODES = [(9010, 950, 0, -7.5)]
COVER_MODES = [(3454, 210, 0, -13)]
WEB_MODES = [(4370, 620, 16, 0), (1390, 340, -26, -12.5)]


def needles(strokes, blows):
    """Needle landings, shattering scale and leaking air excite the crack and the modes of each part."""
    lag_s = .0008  # the needles land this long after the stroke turns
    landed = blows + lag_s * SR
    phase = (strokes - lag_s * PISTON_RATE[0][1]) % 1
    fill_db, rebound_ms, rebound_db = track(FILL_AND_REBOUND)
    at_blow = blows.astype(int)
    change_db = blow_changes(blows)
    hits = landings(landed, change_db, first_s=0.0007, rebound_s=rebound_ms[at_blow] / 1000,
                    scatter_s=0.0011, rebound_share=0.3, rebound_db=rebound_db[at_blow],
                    spread_db=1.5, blow_db=1.3, piston_db=16)
    # each landing leaves a short crunch of breaking scale, its power fading with a 0.84 ms time constant
    fade = np.exp(-1 / (0.00084 * SR))
    crunch = unit(np.sqrt(signal.lfilter([1], [1, -fade], hits ** 2)))
    grit = paths(shared=.28)
    light = ports(invert_db(-10) * hits + (crunch + invert_db(fill_db - 3 - 4.5 * phase)) * grit)
    # apart from the uneven blows, the anvil is struck alike on every stroke
    anvil = invert_db(-3) * ports(unit(clicks(landed, invert_db(change_db))))
    # the heavy casting keeps humming between blows
    hum = invert_db(.5 * fill_db - 4 - 5 * phase)
    heavy = invert_db(-2) * anvil + ports(invert_db(-5.0) * hits + (invert_db(-2) * crunch + hum) * grit)
    # the needles are gripped again as the piston draws back, wherever the fill is below 10 dB
    grip = invert_db((fill_db - 10) * phase ** 3)

    # modes, exciting force and damping, in the order of part_levels()
    parts = [(CASTING_MODES, heavy, 1), (RIB_MODES, light + anvil, 1), (BARREL_MODES, light, grip),
             (NOSE_MODES, light, grip), (NEEDLE_MODES, light, grip), (FLANGE_MODES, heavy, 1),
             (HIGH_NEEDLE_MODES, light, grip), (COLLAR_MODES, light, grip),
             (COVER_MODES, heavy, 1), (WEB_MODES, heavy, 1)]
    out = invert_db(-0.5) * crack(light + invert_db(-14.0) * anvil)
    for (modes, force, damp), part_db in zip(parts, part_levels()):
        out = out + invert_db(part_db) * ring(modes, force, damp, strokes, blows)
    clatter_db = track(CLATTER_LEVEL)[0] + swells(BUNDLE_BITES)
    return invert_db(clatter_db - 0.5) * out


def scene():
    """Wind, exhaust and needles, the last two driven by the same piston."""
    strokes, blows = piston()
    return wind() + exhaust(strokes, blows) + needles(strokes, blows)


def top_cut(x):
    """Nothing passes above the cut-off."""
    return signal.sosfilt(signal.butter(12, 15830, fs=SR, output="sos"), x)


def record(dry):
    """The hardest blows round off and clip."""
    soft = np.clip(np.tanh(0.59 * dry) / 0.64, -1, 1)
    return top_cut(soft)


dry = scene()
out = record(dry)
to_wav(out)
```